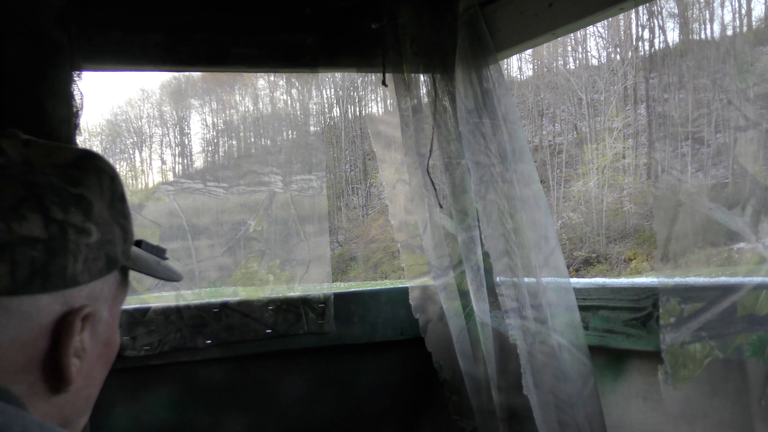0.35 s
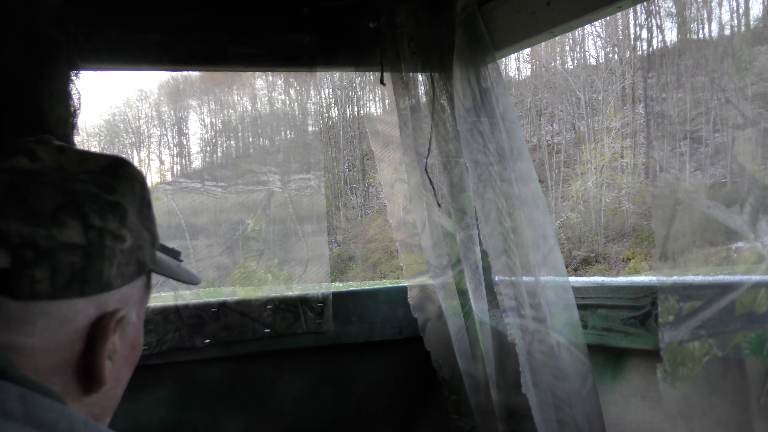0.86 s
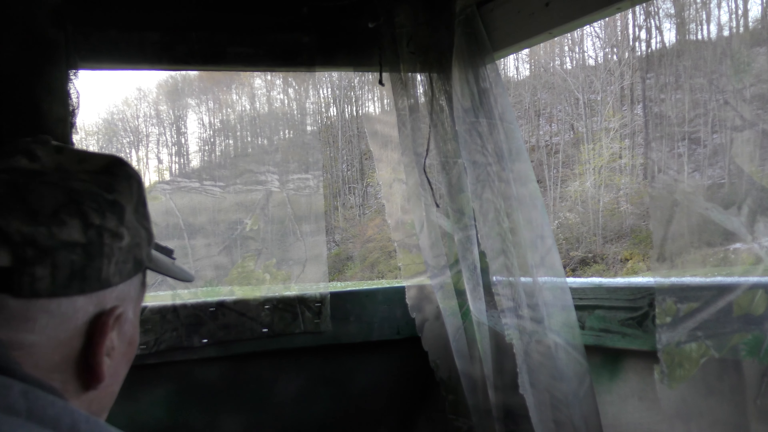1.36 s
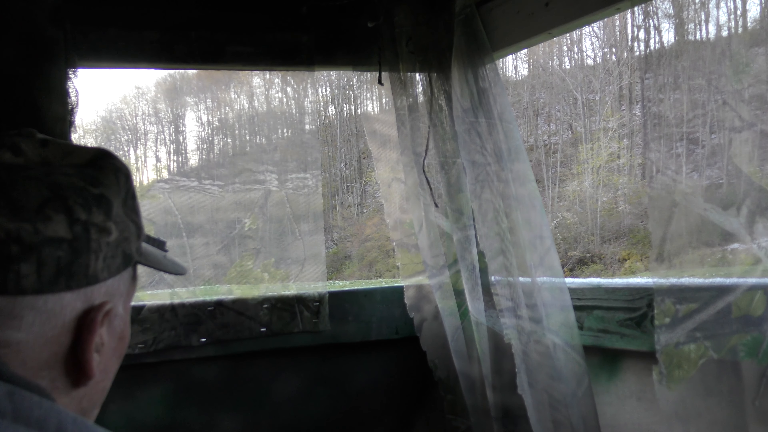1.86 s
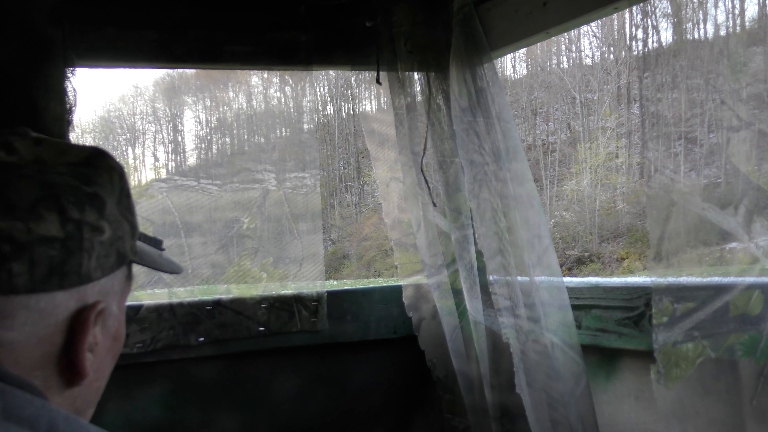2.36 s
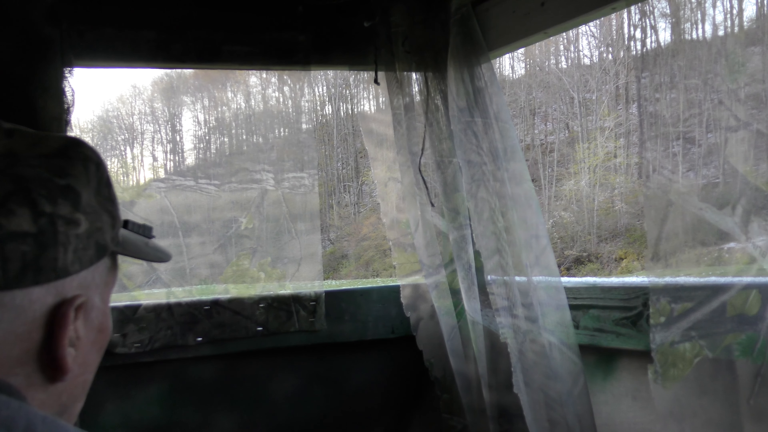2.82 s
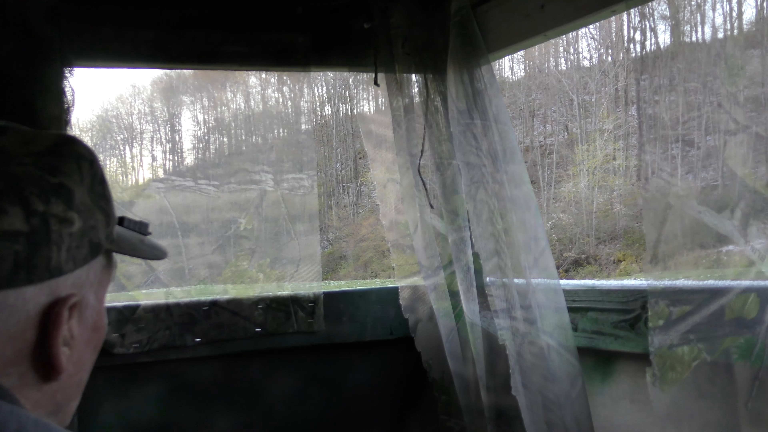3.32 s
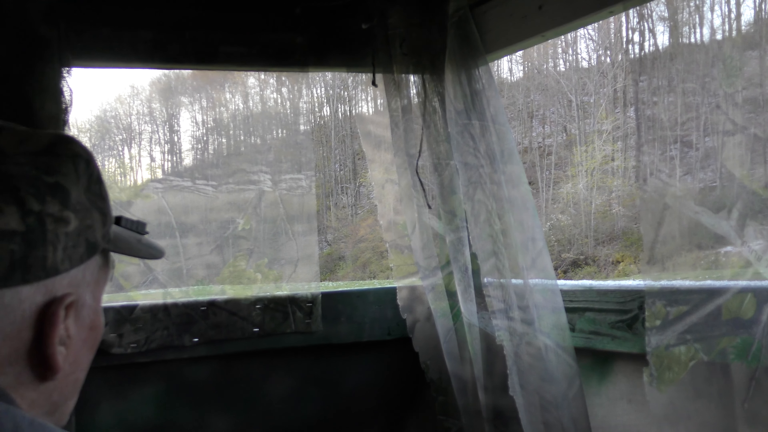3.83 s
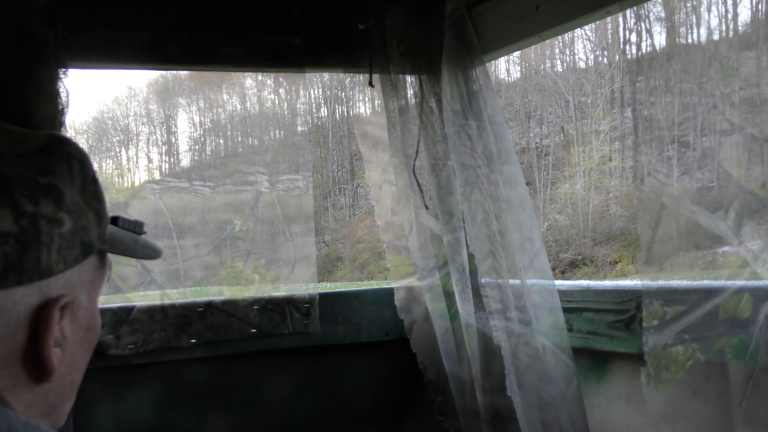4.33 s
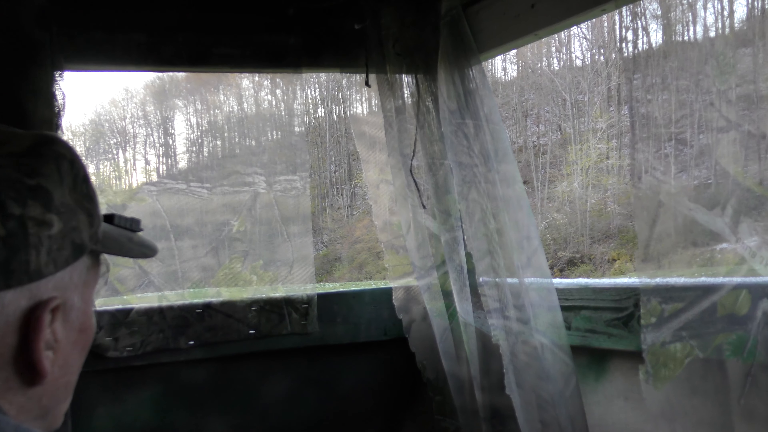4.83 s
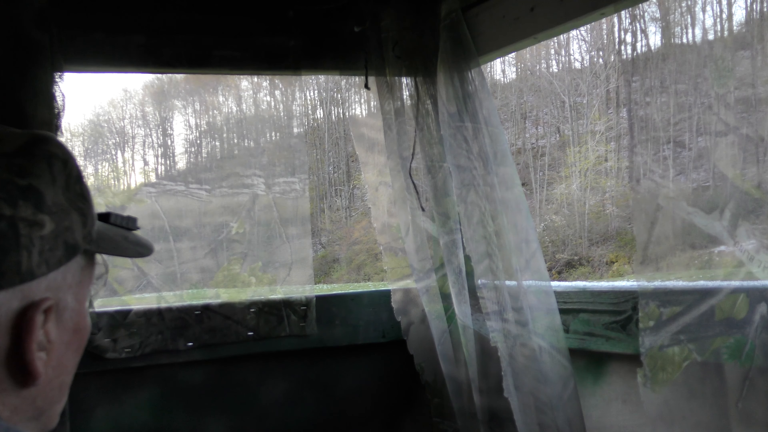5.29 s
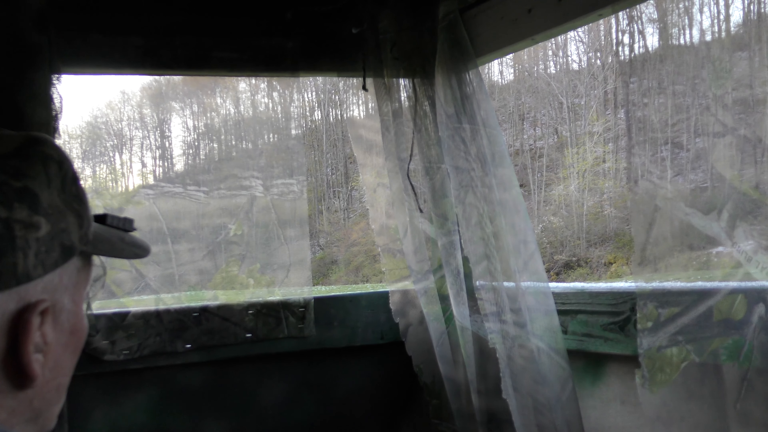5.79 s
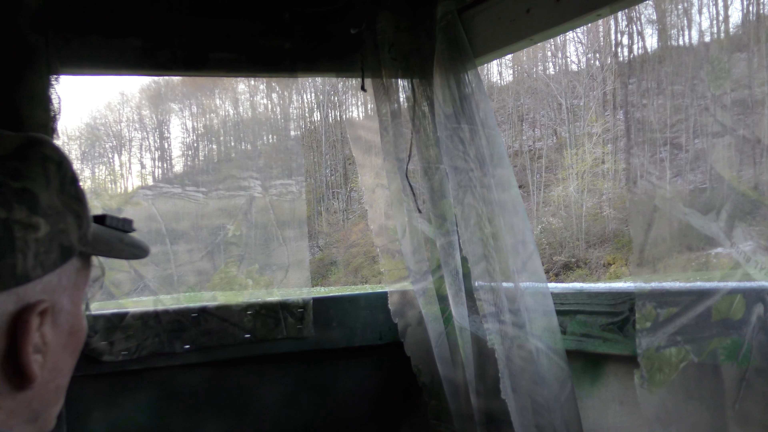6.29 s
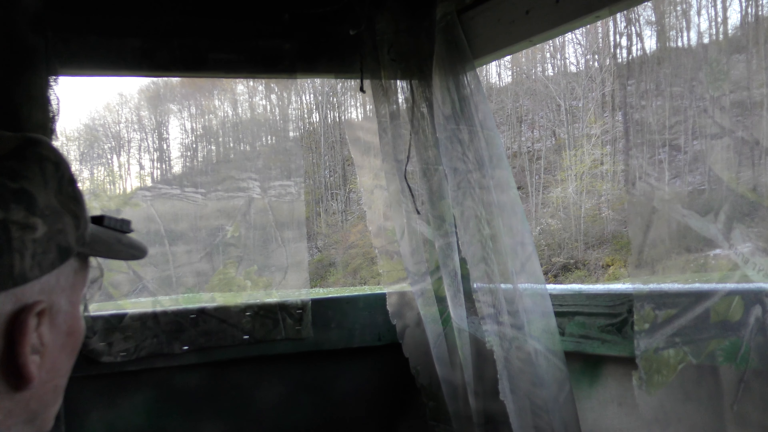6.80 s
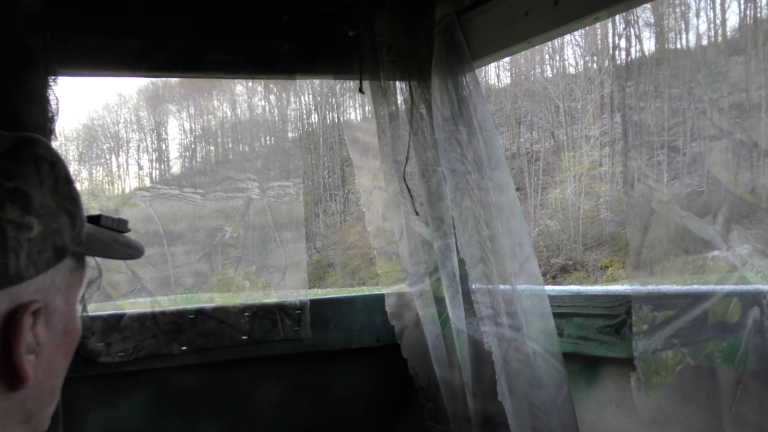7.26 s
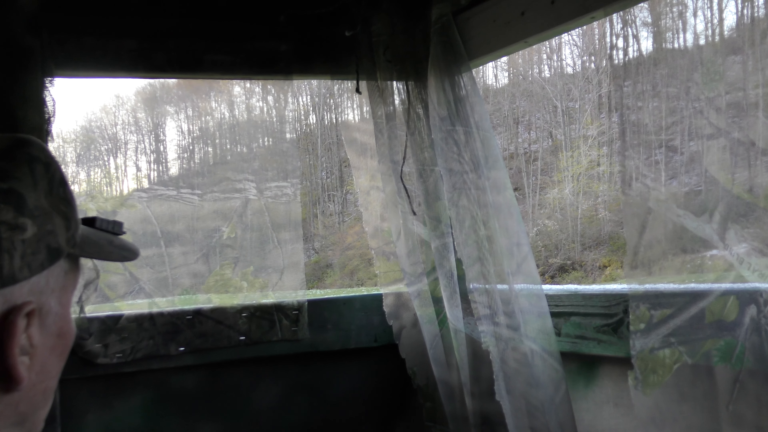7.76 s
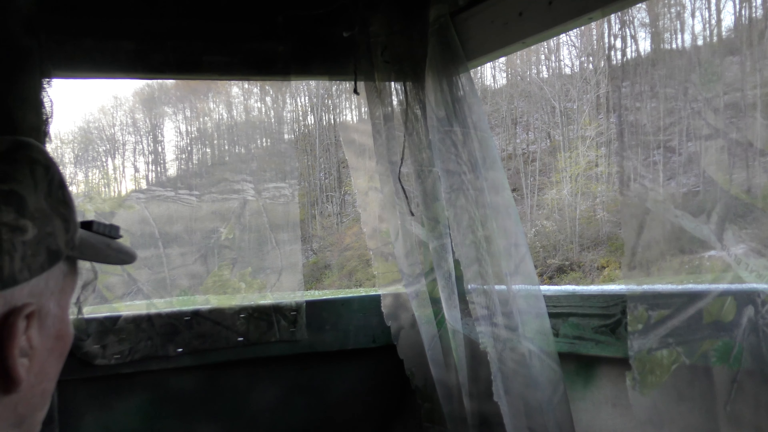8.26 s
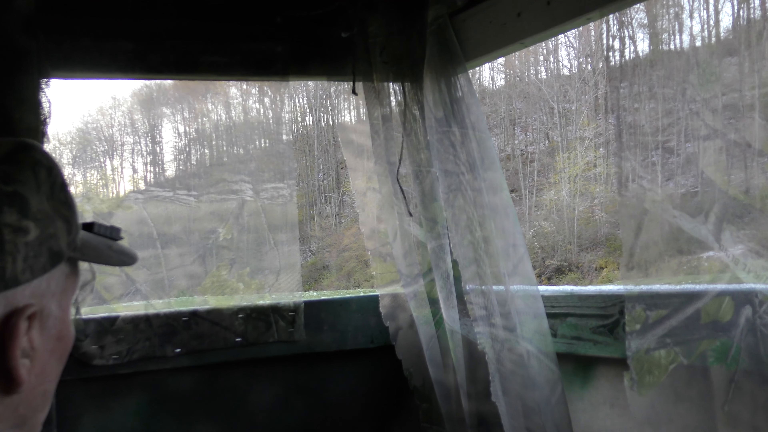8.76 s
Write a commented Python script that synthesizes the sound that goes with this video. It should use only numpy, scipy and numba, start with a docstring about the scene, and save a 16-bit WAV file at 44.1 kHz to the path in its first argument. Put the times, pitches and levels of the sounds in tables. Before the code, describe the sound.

A close, loud reed turkey call in a small wooden hide, with short dry reflections and a faint echo from trees. Two yelps sound at about 0.1 and 0.45 s, each a quick clean squeak jumping up, then a rough nasal buzz dropping to a short whistle. Faint, high songbirds chirp and trill far off until 3.1 s, when six shorter, sharper cutts follow to 4.35 s, about a quarter second apart. Birds return, with a thin high note near 5.1 s. At 6.0 s comes a soft low cluck, with a swell of air and low wind rumble and a thin wavering whine; two clean rising whistles follow at 6.2 and 6.5 s. From 6.8 to 9.05 s seven raspy yelps run evenly, about 0.35 s apart. Quiet woodland air and rumble persist, ducked by automatic gain under each call and recovering between.

```python
"""Turkey call in a wooden hide

A latex reed call gives cutts, yelps, a soft cluck and two whistles in a small hide at the edge of a wood.
Phase-driven lines make the reed: it whistles, jumps, then beats unevenly with half and quarter lines and rasp.
Gliding near-sines make songbirds and a faint whine; shaped noise makes air and rumble.
A gain control ducks everything under each call."""
import sys
import numpy as np
from scipy import signal
from scipy.fft import rfft, irfft, next_fast_len
from scipy.io import wavfile
from scipy.ndimage import uniform_filter1d
from numba import njit

SR = 44100
rng = np.random.default_rng(int(sys.argv[2]) if len(sys.argv) > 2 else 0)


def ratio_of_db(decibels):
    """Turn decibels (scalar or array-like) into linear amplitude factors; 0 dB maps to 1."""
    return 10 ** (np.asarray(decibels, float) / 20)


def master_out(mix):
    """Clip the mix to full scale and print it as 16-bit PCM to the path in sys.argv[1]."""
    frames = np.transpose(np.atleast_2d(mix))
    ceiling = np.clip(frames, -1, 1)
    pcm = np.round(ceiling * 32767).astype(np.int16)
    wavfile.write(sys.argv[1], SR, pcm)


N = 402630

# mouth colour of the clean whistle's overtones: f/Hz, level/dB
WHISTLE_COLOUR = [(2200, -30.5), (2700, -19), (3400, -34.5), (4200, -27), (5500, -51), (6800, -40.5),
                  (7800, -52.5), (9000, -53), (14000, -59)]
# mouth colour of the buzz above its three-halves line: f/Hz, level/dB
BUZZ_COLOUR = [(2100, -44.5), (2800, -20.5), (3100, -22.5), (3500, -32.5), (3850, -26.5), (4200, -35),
               (4600, -33), (5000, -45), (5700, -44.5), (6900, -37), (8000, -43.5), (10500, -49),
               (11800, -52.5), (15500, -60)]
# mouth colour of the rasp: f/Hz, relative density/dB per Hz
RASP_COLOUR = [(400, -31), (700, -14.5), (1050, -9.5), (1500, 3.5), (2400, -4), (3000, -23.5),
               (4000, -14.5), (5200, -33), (6900, -25), (10000, -37), (11800, -33), (15500, -48.5)]
# yelp and cutt openings, clean falling slide then jump:
# t/s, slide/s, slide middle f/Hz, jump middle f/Hz, jump level/dB
OPENING_NOTES = [(0.099, .009, 1167, 1655, -1.5), (.441, .014, 1146, 1671, -2.5),
                 (3.13, 0.00359, 1091, 1400, -3.5), (3.277, .007, 1150, 1973, -4.5),
                 (3.488, .003, 1315, 1577, 6.5), (3.74, .010, 1122, 1518, 3.5),
                 (4.015, 0.014, 1145, 1674, 0.5), (4.283, .008, 1127, 1646, 5),
                 (6.786, 0.0079, 1087, 1495, -3), (7.141, 0.026, 1112, 1560, -9.5),
                 (7.517, 0.022, 1026, 1658, -1.5), (7.881, 0.0076, 1166, 1674, -2),
                 (8.236, 0.0079, 1205, 1624, 2.5), (8.566, 0.015, 1110, 1603, -4.5),
                 (8.920, .010, 1214, 1691, 3)]
# uneven beating after each opening: t/s, length/s, base reed f/Hz, reed f rise target/Hz, rasp base/dB
BEATING_NOTES = [(0.123, 0.059, 1364, 1421, -28.5), (0.465, 0.0677, 1400, 1433, -22.5),
                 (3.143, 0.037, 1212, 1393, -27), (3.291, 0.0324, 1719, 1756, -19.5),
                 (3.503, 0.0438, 1538, 1642, -17), (3.759, 0.0409, 1441, 1582, -19),
                 (4.032, 0.0597, 1473, 1687, -20.5), (4.302, 0.0492, 1486, 1717, -18),
                 (6.802, 0.0502, 1209, 1257, -20.5), (7.169, 0.0587, 1325, 1409, -25),
                 (7.541, 0.0627, 1341, 1387, -23), (7.899, 0.0687, 1371, 1431, -24.5),
                 (8.254, 0.078, 1392, 1390, -20), (8.581, 0.0796, 1373, 1439, -24),
                 (8.94, 0.0836, 1400, 1482, -21)]
# course of the beating: share of length/1, whistle/dB, three-halves line/dB, rasp offset/dB
BEATING_COURSE = [(0, 3.5, -12.5, 9), (.15, 0, -2.5, 5), (.5, 4.5, 0.5, 2), (.8, -2, -4, 3.5),
                  (1, -10.5, -1, 5)]
# mouth resonance on the beating lines: f/Hz, gain/dB
MOUTH_GAIN = [(1200, -9), (1400, -6.5), (1550, -6.5), (1730, -1), (1850, -2), (2100, 5.5), (2300, 2),
              (2480, -5.5), (2600, -29)]
# closings, upward flip then plain whistle: t/s, length/s, flip middle f/Hz, whistle f/Hz, level/dB
CLOSING_NOTES = [(0.182, 0.0316, 1598, 1313, -8.5), (.537, 0.0293, 1513, 1319, -5),
                 (3.18, 0.0156, 1400, 1289, -16.5), (3.312, 0.038, 1637, 1400, -5.5),
                 (3.539, 0.0213, 1668, 1505, -2), (3.796, 0.0237, 1614, 1351, -3.5),
                 (4.074, 0.0212, 1666, 1400, 0.5), (4.341, 0.0181, 1641, 1441, 1.5),
                 (6.861, 0.0228, 1337, 1129, -9), (7.238, 0.0358, 1555, 1266, -6.5),
                 (7.61, 0.0376, 1511, 1341, -8.5), (7.97, 0.0387, 1547, 1326, -5),
                 (8.327, 0.0375, 1606, 1369, -0.5), (8.658, 0.034, 1546, 1362, -3.5),
                 (9.018, 0.0363, 1566, 1367, -3.5)]
# two clean whistles that end rising, one table each: t/s, reed f/Hz, level/dB
WHISTLE_TRACKS = [
    [(6.222, 1128, 1.5), (6.27, 1091, 5.5), (6.3, 1237, 6.5), (6.306, 1267, 1.5), (6.332, 1372, 14),
     (6.345, 1477, -2.5)],
    [(6.494, 1435, 1.5), (6.506, 1332, 4), (6.526, 1300, 2.5), (6.558, 1340, 12), (6.604, 1436, 8),
     (6.628, 1623, 9), (6.645, 1718, -1)],
]
# soft low cluck, scooping down and up: t/s, reed f/Hz, whistle level/dB, doubled line level/dB
CLUCK_TRACK = [(5.968, 879.5, -14.5, -41), (5.987, 852, -13.5, -34), (5.995, 623.5, -12, -13.5),
               (6.011, 609, -5, -8.5), (6.031, 694.8, -12, -2.5), (6.039, 868, -4, -21.5),
               (6.046, 1008, 6, -27.5), (6.053, 1043, 0.5, -41.5)]
# songbird notes: t/s, length/s, start f/Hz, end f/Hz, level/dB, trill/0-1
BIRD_NOTES = [(0.646, 0.0552, 2908, 3410, -37.5, 0.85), (0.809, 0.102, 3470, 2476, -46, 0.33),
              (1.056, 0.0352, 3184, 3203, -35.5, 0.07), (1.075, 0.089, 3019, 1976, -37.5, 0.55),
              (1.301, 0.0717, 2237, 2100, -40.5, 0), (1.362, 0.077, 2504, 2509, -36.5, 0.84),
              (1.676, 0.022, 4027, 4224, -47, 0.12), (1.701, 0.051, 5080, 4750, -53, 0.58),
              (1.771, 0.059, 3670, 3570, -48, .7), (1.764, 0.081, 7800, 7920, -58, 0.59),
              (1.928, 0.0426, 3396, 3250, -51.5, 0.32), (2.131, 0.0397, 2369, 1883, -49.5, 0.42),
              (2.416, 0.07, 5043, 5350, -42, 0.51), (2.494, 0.095, 5267, 5321, -45, 0),
              (2.432, 0.0715, 3480, 3590, -41.5, 0.84), (2.857, 0.0486, 2401, 3594, -40.5, 0.84),
              (2.923, 0.0435, 2960, 2278, -39, 0.5), (3.006, 0.0833, 2980, 2103, -44, 0.06),
              (3.615, .08, 3230, 4423, -44.5, 0.98), (3.91, 0.044, 3680, 3700, -52, 0.04),
              (4.112, 0.052, 3600, 3423, -45.5, 0.13), (4.539, 0.114, 2848, 2055, -47, 0.54),
              (4.979, 0.12, 3642, 2551, -41, 0.49), (5.076, 0.398, 6004, 5989, -48.5, 0.19),
              (4.557, 0.078, 5350, 5150, -61.5, 0.07), (5.22, 0.0356, 2300, 2700, -44.5, 0.59),
              (5.698, 0.045, 5700, 5680, -51, 0.28), (5.57, 0.063, 4105, 6570, -51.5, 0.54),
              (5.789, 0.0388, 5090, 8000, -45.5, 1), (5.828, 0.046, 3170, 3044, -46.5, 0.29),
              (6.082, 0.04, 5200, 8080, -37, 1), (6.109, 0.047, 3100, 3108, -37.5, .2),
              (6.165, 0.03, 7670, 7150, -55.5, 0.1), (6.172, .06, 3600, 3700, -38, .6),
              (6.385, 0.14, 3300, 3600, -40.5, 0.84), (6.689, 0.0633, 3200, 3000, -30, 1),
              (7.104, 0.063, 3200, 3200, -44, 0.09), (7.4, .05, 2180, 2219, -40, 0.39),
              (7.442, .07, 2300, 2658, -36.5, 1), (7.388, 0.0676, 8430, 4080, -46, 0.85),
              (8.734, 0.048, 2780, 3220, -46, 0.23)]
# wavering whine, one table per strand: t/s, f/Hz, level/dB
WHINE_STRANDS = [
    [(3.9, 933, -36), (4.0, 893, -34.5)],
    [(5.83, 220, -49.5), (5.97, 500, -34)],
    [(6.05, 430, -30.5), (6.23, 540, -32)],
    [(6.12, 980, -41.5), (6.17, 1030, -27), (6.22, 1080, -25)],
    [(6.44, 930, -24.5), (6.55, 1120, -59), (6.61, 1200, -22.5), (6.7, 1020, -24), (6.78, 920, -29)],
]
# passing swell of air and rumble: t/s, gain/dB
BREEZE_SWELL = [(5.9, 0), (6.1, 13), (6.8, 7), (7.3, 4)]
# woodland air spectrum: f/Hz, relative density/dB per Hz
AIR_COLOUR = [(40, -23.5), (70, 0.5), (105, -7), (245, -6), (450, -15), (1300, -15), (2400, -18.5),
              (4500, -28.5), (8000, -37.5), (11500, -51), (16000, -61)]


def caller():
    """All reed calls, with echo from the close walls of the hide and the trees beyond."""
    out = np.zeros(N)
    for row in OPENING_NOTES:
        opening(out, *row)
    for row in BEATING_NOTES:
        add(out, *reed(beating(*row)))
    for row in CLOSING_NOTES:
        closing(out, *row)
    for table in WHISTLE_TRACKS:
        add(out, *reed([(s, hz, db, -57, -40) for s, hz, db in table]))
    # cluck: low register, then the line at twice its pitch
    add(out, *reed([(s, hz, db, -70, -39) for s, hz, db, _ in CLUCK_TRACK]))
    add(out, *reed([(s, 2 * hz, db, db - 13.5, db - 24.5) for s, hz, _, db in CLUCK_TRACK]))
    hide = signal.fftconvolve(out, tail(0.0832, 6200, 0.0044))[:N]
    trees = signal.fftconvolve(out, tail(0.284, 1800, 0.02))[:N]
    return out + ratio_of_db(-10) * hide + ratio_of_db(-37.0) * trees


def opening(out, s, slide_s, slide_hz, jump_hz, jump_db):
    """Clean falling slide, then the reed jumps up in pitch."""
    slide_fall, jump_fall, jump_s = 0.319, 0.0776, 0.00807  # falls: share of middle pitch
    add(out, *squeak(s, slide_s, slide_hz * (1 + slide_fall / 2), slide_hz * (1 - slide_fall / 2), 0))
    add(out, *squeak(s + slide_s + .001, jump_s,
                     jump_hz * (1 + jump_fall / 2), jump_hz * (1 - jump_fall / 2), jump_db))


def beating(s, length_s, low_hz, last_hz, rasp_db):
    """Reed controls for the buzzing middle; the mouth favours lines near its resonance."""
    settle_share, settle_s, rise_power = 0.07136, 0.00776, 1.775
    onset_hz, slack_drop = 1400, 0.41  # a reed based below onset_hz starts nearer to it
    u = np.linspace(0, 1, 16)
    # pitch drops into place, then moves to its end
    excess_hz = settle_share * low_hz + slack_drop * max(onset_hz - low_hz, 0)
    settling_hz = excess_hz * np.exp(-u * length_s / settle_s)
    hz = low_hz + settling_hz + (last_hz - low_hz) * u ** rise_power
    share, *course = np.transpose(BEATING_COURSE)
    whistle_db, buzz_db, tear_db = (np.interp(u, share, c) for c in course)
    mouth_hz, mouth_db = np.transpose(MOUTH_GAIN)
    whistle_db = whistle_db + np.interp(hz, mouth_hz, mouth_db)
    buzz_db = buzz_db + np.interp(3 * hz / 2, mouth_hz, mouth_db)
    return np.transpose([s + u * length_s, hz, whistle_db, buzz_db, rasp_db + tear_db])


def closing(out, s, length_s, flip_hz, end_hz, db):
    """Rising flip, then the buzz dies out under a plain whistle."""
    flip_s, flip_rise, rasp_db = .012, 0.0635, db - 28.5  # rise: share of middle pitch
    add(out, *squeak(s, flip_s, flip_hz * (1 - flip_rise / 2), flip_hz * (1 + flip_rise / 2), db + 5.5))
    add(out, *reed([(s + flip_s, end_hz * .98, db, db + 0.5, rasp_db),
                    (s + (flip_s + length_s) / 2, end_hz, db + 1.5, db - 39.5, rasp_db + 2),
                    (s + length_s, end_hz * 1.02, db - 0.5, db - 51.5, rasp_db + 5)]))


def reed(table):
    """Whistle, uneven beating at half the reed rate, and slips at a quarter of it."""
    start, edge, (hz, whistle_db, buzz_db, rasp_db) = play(table, .006)
    size = len(hz)
    loud_db = np.maximum(whistle_db, buzz_db)
    # the raspier the reed, the more its cycles wobble
    rough = np.clip(ratio_of_db(rasp_db - loud_db), 0, 1)
    wobbled_hz = uniform_filter1d(hz, 400) * (1 + (.004 + .018 * rough) * walk(200, size))
    phase = 2 * np.pi * np.cumsum(wobbled_hz) / SR
    buzz = np.sqrt(2) * np.sin(3 * phase / 2) + partials(phase, hz, np.arange(4, 21) / 2, BUZZ_COLOUR)
    # the half line grows with buzz and rasp
    half = (ratio_of_db(buzz_db - 36) + ratio_of_db(rasp_db + 4.5)) * np.sin(phase / 2)
    # every fourth cycle slips: odd quarter lines, with air tearing through between them
    slips = partials(phase, hz, np.arange(3, 21, 2) / 4, RASP_COLOUR)
    torn_air = colour(rng.standard_normal(size) * (1 + 0.336 * np.cos(phase / 2)), RASP_COLOUR)
    rasp = ratio_of_db(rasp_db) * (ratio_of_db(-0.5) * slips + ratio_of_db(7.0) * torn_air)
    breath = ratio_of_db(loud_db - 35.5) * torn_air
    # a raspy reed also shakes in strength, whistle against buzz
    shake_db = np.sqrt(rough) * walk(250, size) * 4
    tones = ratio_of_db(whistle_db + shake_db) * whistle(phase) + ratio_of_db(buzz_db - shake_db) * buzz
    return start, edge * (tones + half + rasp + breath)


def squeak(s, length_s, start_hz, end_hz, db):
    """Short clean slide of the reed with a puff of air, peaking late."""
    u = np.linspace(0, 1, int((length_s + 0.00635) * SR))
    tone = whistle(2 * np.pi * np.cumsum(start_hz + (end_hz - start_hz) * u) / SR)
    puff = ratio_of_db(-19) * u * colour(rng.standard_normal(len(u)), RASP_COLOUR)
    swell = np.sin(np.pi * u ** 1.182) ** 2
    return int((s - .002) * SR), ratio_of_db(db) * swell * (tone + puff)


def whistle(phase):
    """Clean reed register: fundamental of rms 1; overtones take the mouth's colour and come and go."""
    hz = np.gradient(phase) * SR / (2 * np.pi)
    mouth_hz, mouth_db = np.transpose(WHISTLE_COLOUR)
    over = 0
    for k in range(2, 10):
        db = np.interp(np.log(k * hz), np.log(mouth_hz), mouth_db) + 3.304 * walk(71.66, len(phase))
        over = over + ratio_of_db(db) * np.sin(k * phase + k)
    return np.sqrt(2) * (np.sin(phase) + over)


def partials(phase, hz, multiples, mouth):
    """Lines on multiples of the reed rate, coloured by the mouth; each flutters alone."""
    mouth_hz, mouth_db = np.transpose(mouth)
    out = 0
    for k in multiples:
        flutter_db = (2.9 + 0.2685 * k) * walk(130, len(hz))
        db = np.interp(np.log(k * hz), np.log(mouth_hz), mouth_db) + flutter_db
        out = out + ratio_of_db(db) * np.sin(k * phase + rng.uniform(0, 2 * np.pi))
    return np.sqrt(2) * out


def birds():
    """Far, gliding near-sines, some trilled, over a faint chorus, smeared by the wood."""
    out = np.zeros(N)
    chorus = []
    for when, a, b, c in rng.uniform(0, 1, (90, 4)):
        hz = 2100 + 1700 * b
        chorus.append((when ** .7 * N / SR, .05 + .15 * a, hz, hz + 900 * (c - .6), -57, .7))
    for s, length_s, start_hz, end_hz, db, trill in BIRD_NOTES + chorus:
        u = np.linspace(0, 1, int(length_s * SR))
        hz = (start_hz + (end_hz - start_hz) * u) * (1 + 0.00119 * walk(60, len(u)))
        # a trilled note warbles so fast that it spreads into a band
        hz = hz * (1 + .075 * trill ** 2 * walk(600, len(u)))
        flutter = walk(39.67, len(u))
        shape = np.clip(6 * np.minimum(u, 1 - u), 0, 1) * ratio_of_db(2.7 * (flutter - flutter.mean()))
        tone = np.sqrt(2) * np.sin(2 * np.pi * np.cumsum(hz) / SR)
        add(out, int(s * SR), ratio_of_db(db) * shape * tone)
    wood = signal.fftconvolve(out, tail(.8, 5000, .01))[:N]
    return out + ratio_of_db(-6) * wood


def whine():
    """Thin sine strands that slide and waver in pitch and strength."""
    out = np.zeros(N)
    for table in WHINE_STRANDS:
        start, edge, (hz, db) = play(table, .02)
        hz = uniform_filter1d(hz, 1500) * (1 + .02 * walk(60, len(hz)))
        level = ratio_of_db(db + 4.7 * walk(26, len(hz)))
        add(out, start, edge * level * np.sin(2 * np.pi * np.cumsum(hz) / SR))
    return out


def air():
    """Woodland air noise over gusty rumble of wind pressure on the microphone; both share one swell."""
    bed = ratio_of_db(-41.5 + walk(2.6125, N)) * colour(rng.standard_normal(N), AIR_COLOUR)
    gust_colour = [(6, -22), (14, 20.5), (26, 6.5), (40, 2), (60, -16.5), (120, -55.5)]  # f/Hz, level/dB
    gust = ratio_of_db(-25.5 + 4 * walk(6, N)) * colour(rng.standard_normal(N), gust_colour)
    swell = ratio_of_db(np.interp(np.arange(N) / SR, *np.transpose(BREEZE_SWELL)))
    return swell * (bed + gust)


def colour(x, points):
    """Shapes x by (f/Hz, level/dB) points and brings it to rms 1."""
    hz, db = np.transpose(points)
    n = next_fast_len(len(x))
    log_f = np.log(np.maximum(np.fft.rfftfreq(n, 1 / SR), 1))
    y = irfft(rfft(x, n) * ratio_of_db(np.interp(log_f, np.log(hz), db)), n)[:len(x)]
    return y / np.sqrt(np.mean(y ** 2))


def walk(rate_hz, size):
    """Random levels held 1 / rate_hz and slewed twice; spread near 1."""
    k = max(int(SR / rate_hz), 1)
    steps = np.repeat(rng.standard_normal(size // k + 1), k)
    return 1.597 * uniform_filter1d(uniform_filter1d(steps, k), k)[:size]


def play(table, fade_s):
    """Start sample, a fade in and out, and the table's columns sample by sample."""
    s, *columns = np.transpose(table)
    t = np.arange(s[0] - fade_s, s[-1] + fade_s, 1 / SR)
    edge = np.clip(np.minimum(t - t[0], t[-1] - t) / fade_s, 0, 1) ** 2
    return int(t[0] * SR), edge, [np.interp(t, s, c) for c in columns]


def add(out, start, x):
    """Mixes x into out from sample start on."""
    out[start:start + len(x)] += x[:len(out) - start]


def tail(t60_s, cutoff_hz, skip_s):
    """Causal echo tail of unit energy: decaying noise, silent up to skip_s, duller above cutoff_hz."""
    t = np.arange(int(t60_s * SR)) / SR
    noise = signal.lfilter(*signal.butter(1, cutoff_hz, fs=SR), rng.standard_normal(len(t)))
    h = noise * ratio_of_db(-60 * t / t60_s) * (t > skip_s)
    return h / np.sqrt(np.sum(h ** 2))


@njit
def ride(x, top_db, slope, hold_s, fast_s, slow_s, share, start_db):
    """Gain control on its own output's peak: a quick and a slow stage, each (attack, release) in s."""
    y, peak, a, b = np.empty(len(x)), 1e-6, 0., start_db
    for i in range(len(x)):
        y[i] = x[i] * 10 ** (-(a + share * b) / 20)
        peak = max(abs(y[i]), peak * (1 - 1 / (hold_s * SR)))
        over = slope * max(20 * np.log10(peak) - top_db, 0.)
        a += (over - a) / (SR * (fast_s[0] if over > a else fast_s[1]))
        b += (over - b) / (SR * (slow_s[0] if over > b else slow_s[1]))
    return y


def scene():
    """Caller, birds, whine and air at one microphone."""
    return (caller() + birds() + whine() + air())[None]


def top_cut(x):
    """Nothing passes above the cut-off."""
    return signal.sosfilt(signal.butter(12, 16120, fs=SR, output="sos"), x)


def record(dry):
    """Gain control, then clipping at full scale."""
    ridden = ride(dry[0], -19.5, 2.019, 0.0063, np.array([.135, .053]), np.array([.23, .32]), 1.236, 1.0)
    mix = np.clip(ridden, -1, 1)[None]
    return top_cut(mix)


dry = scene()
out = record(dry)
master_out(out)
```